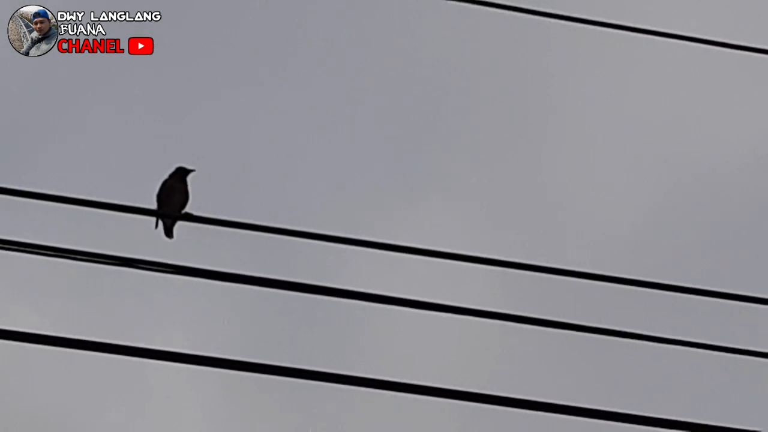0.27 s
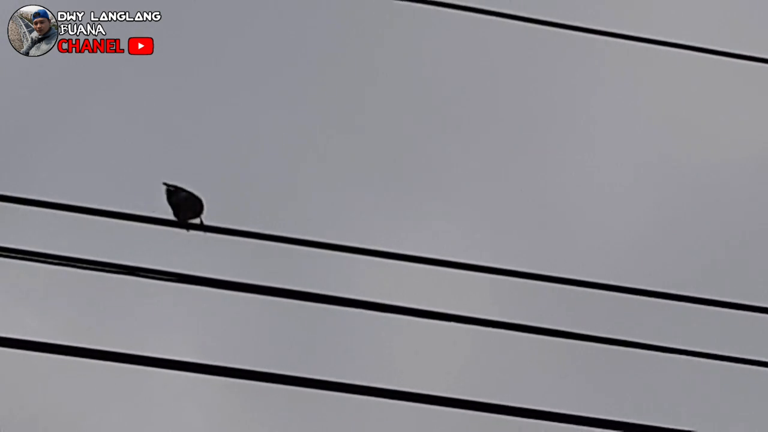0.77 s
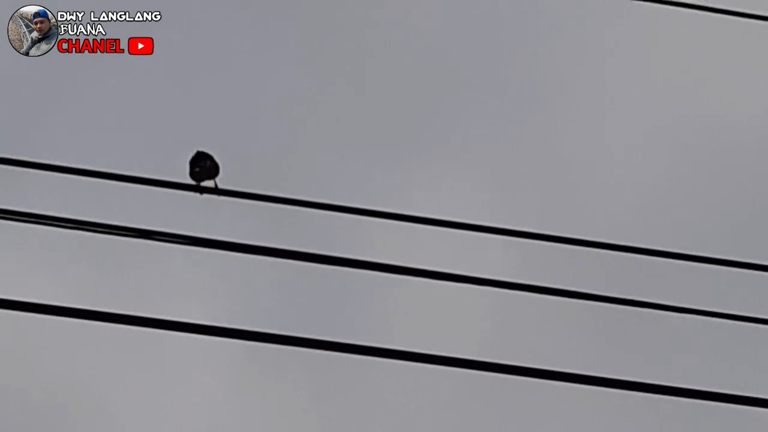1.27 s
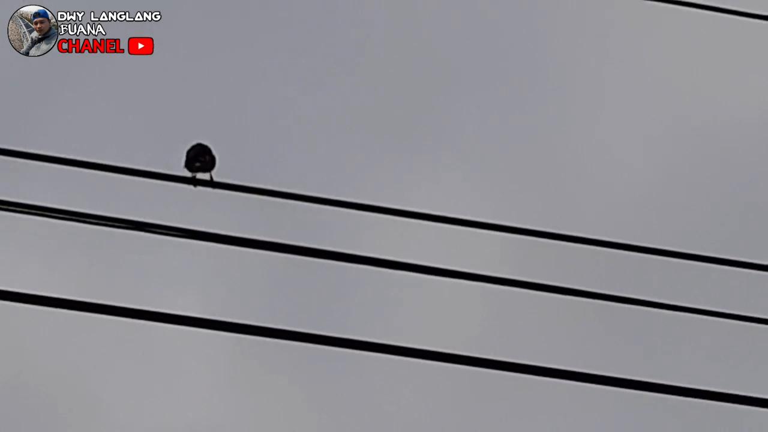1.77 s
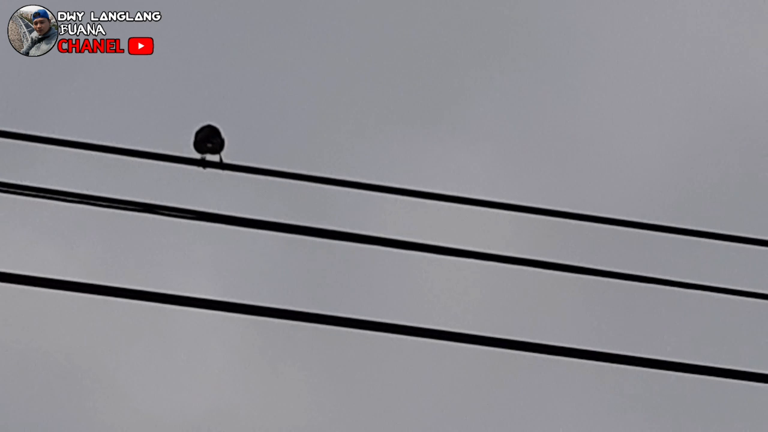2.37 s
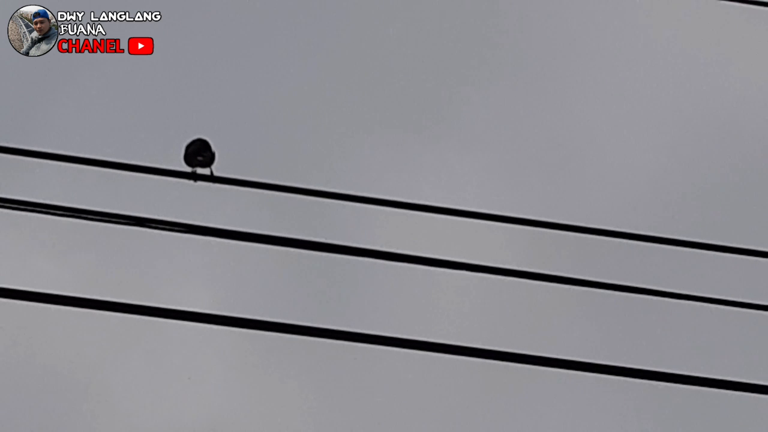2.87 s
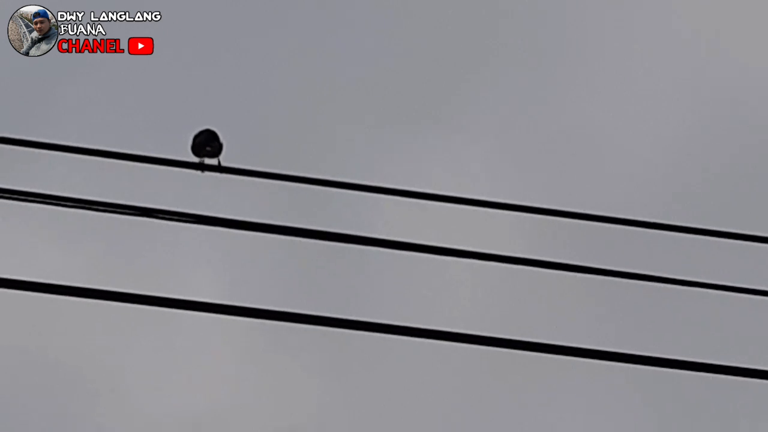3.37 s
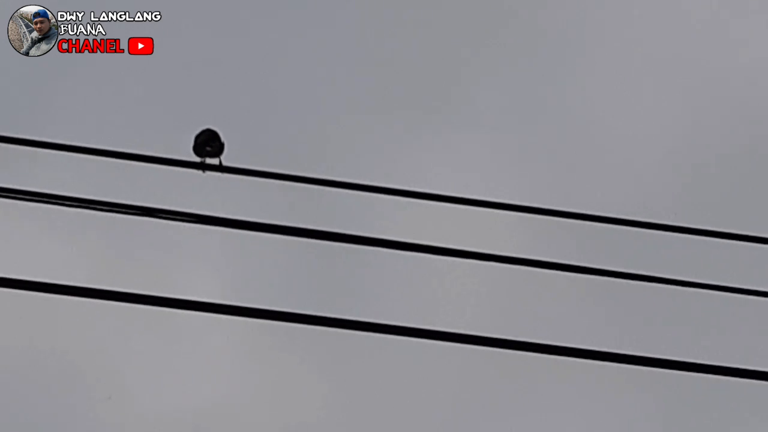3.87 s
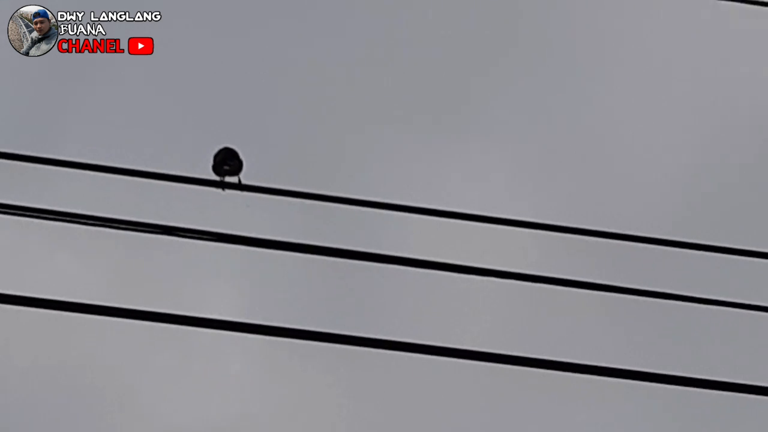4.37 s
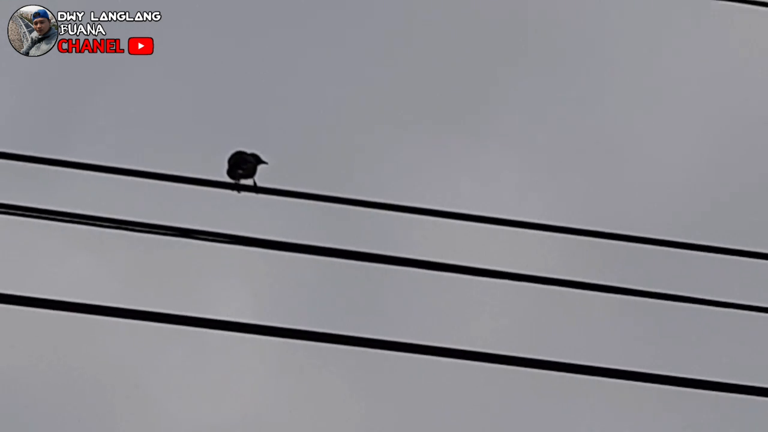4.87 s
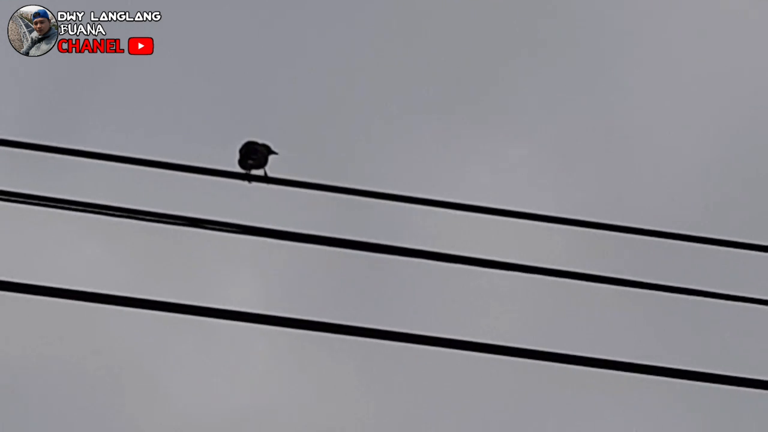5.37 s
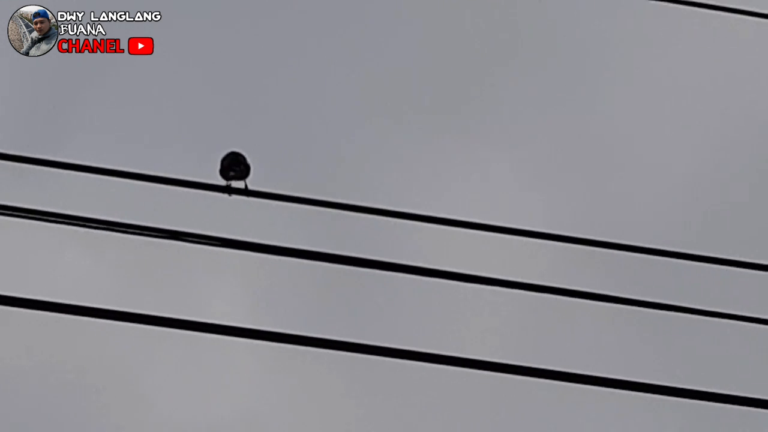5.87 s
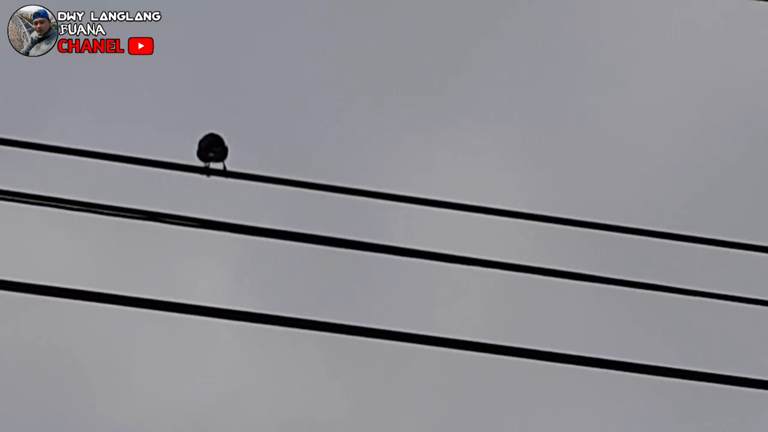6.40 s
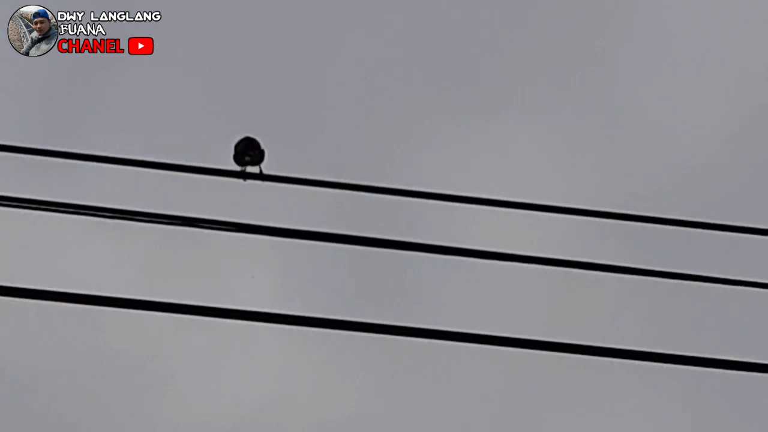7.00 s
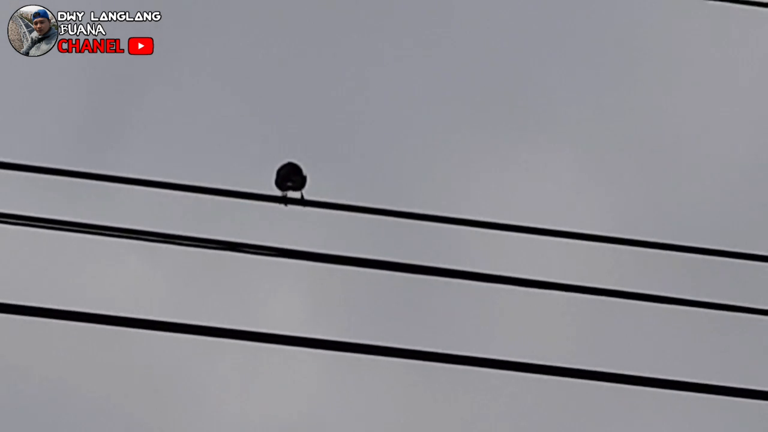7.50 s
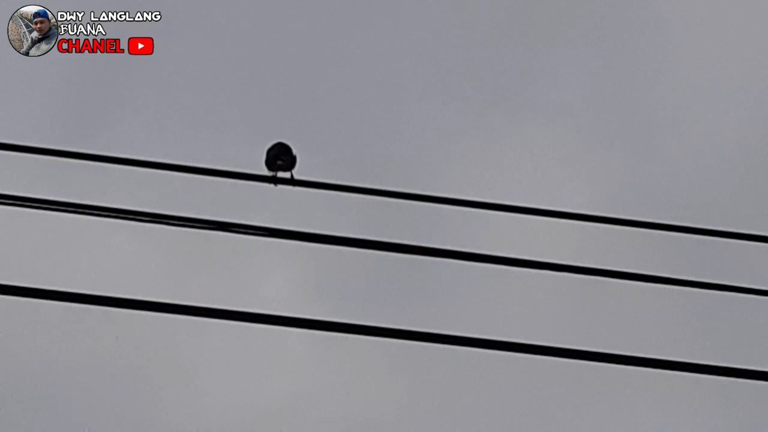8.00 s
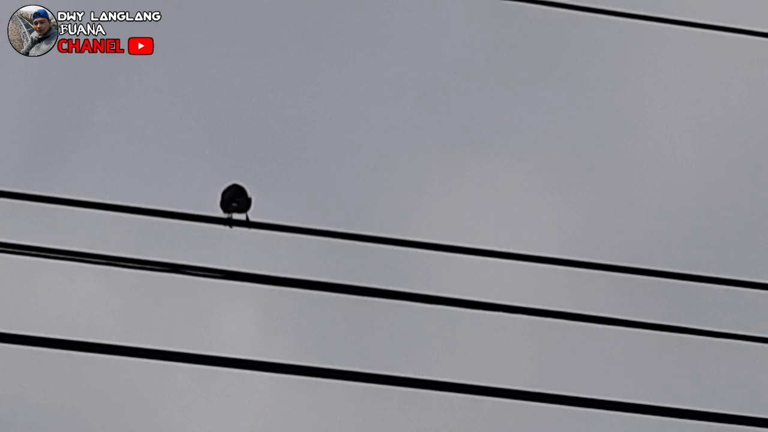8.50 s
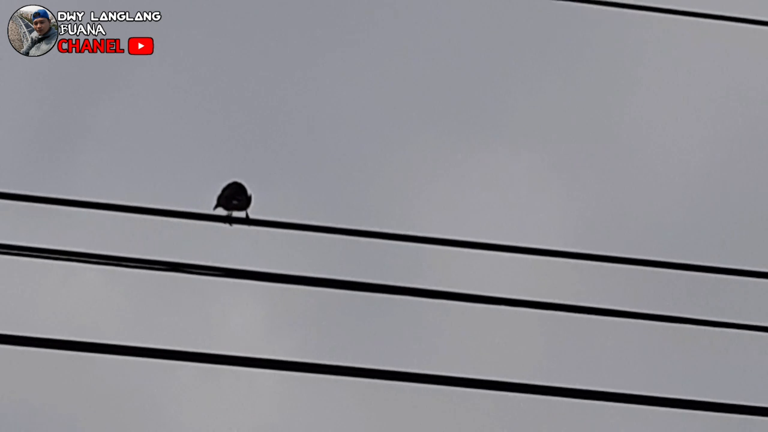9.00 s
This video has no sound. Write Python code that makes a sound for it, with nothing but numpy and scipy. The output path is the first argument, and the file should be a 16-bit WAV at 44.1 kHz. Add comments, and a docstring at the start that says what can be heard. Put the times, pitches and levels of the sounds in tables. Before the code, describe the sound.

Outdoors on a street, a starling sings from a wire a little to the left, with light reflections from nearby houses. After a soft scuff it gives a short warble and three pairs of chips and falling whistles. Far birds peep faintly and an insect barely sounds during a lull. The starling returns with two raspy mews and five rapid trills. Road rumble runs throughout, growing at the end as a vehicle approaches.

```python
"""Over the noise of a distant road a dull scuff dies away, and a starling on a wire begins to sing.
Its syrinx, whose pitch follows membrane tension, gives an opening note, then three chips, each followed
by a falling warbled slur; walls, roofs and a far house front reflect the song. In the pause come faint
peeps and a thin insect tone, and a fine hiss rises. Two hoarse two-voiced mews and five quick trills
follow. Last, the tyres and exhaust of an approaching vehicle swell as its engine takes on load."""
import sys
import numpy as np
from scipy import signal
from scipy.fft import rfft, irfft, next_fast_len
from scipy.io import wavfile
from scipy.ndimage import map_coordinates

SR = 44100
rng = np.random.default_rng(int(sys.argv[2]) if len(sys.argv) > 2 else 0)


def persist_wave(psi):
    """Save psi, clipped to +-1, as 16-bit WAV."""
    counts = np.round(np.clip(psi, -1, 1) * 32767).astype(np.int16)
    wavfile.write(sys.argv[1], SR, np.atleast_2d(counts).T)


N = 407925
JOIN_S = .0012  # a note fades in and out over this time

# Resonances of the open beak: f/Hz, gain/dB
BEAK = [(800, -36), (1300, -15.5), (2000, -0.5), (3600, -5), (4900, -19), (6200, -4.5), (7000, -8.5),
        (8200, -5), (9200, -24), (10500, -16), (12000, -23), (13500, -20), (15500, -42)]


def starling(breath_db=-22):
    """Source and filter: syrinx tones plus noise that the beak shapes and that follows the effort."""
    # Chips: t/s at which the whistle locks, level/dB, f/Hz
    chips = [(1.176, -19, 3296), (1.623, -17.5, 3295), (2.115, -19.5, 3253)]
    # Falling slurs: t/s, level/dB, f/Hz, warble rate/Hz
    slurs = [(1.271, -18, 3126, 51.9), (1.720, -19, 2950, 56.7), (2.213, -20.5, 3050, 56.6)]
    # Trills: t/s, level/dB, f/Hz, warble length/s, warble rate/Hz
    trills = [(6.895, -16.5, 2936, 0.12, 76.3), (7.128, -17.5, 2815, .122, 76.7),
              (7.349, -17, 2730, 0.13, 74.4), (7.575, -17.5, 2617, 0.13, 74.8),
              (7.81, -18.5, 2596, .13, 74.6)]
    # Mews: t/s of the split, level/dB, rise length/s, arch length/s, arch height/Hz, closing level/dB
    mews = [(5.801, -25, .026, .06, 471, -29), (6.557, -23, .057, .052, 181, -20.5)]
    calls = (chip, chips), (slur, slurs), (trill, trills), (mew, mews)
    voice, effort = opener() + sum(call(*row) for call, rows in calls for row in rows)
    breath = unit(filtered(rng.standard_normal((2, N)), lambda hz: amp(along(BEAK, hz))))
    return voice + amp(breath_db) * effort * breath


def syrinx(start_s, hz, db, rasp, depth=0, warble_hz=0, stutter=0, narrow=4,
           jitter=.011, dip_db=36, flutter_db=5, slack_hz=2250, flap_hz=240):
    """Membrane oscillation: tension modulates pitch and level together. Returns voice and effort."""
    # Overtones ahead of the beak: harmonic number, level/dB
    overtones = [(2, -20), (3, -24.5), (4, -24.5), (5, -30)]
    # Resonances of the throat: f/Hz, gain/dB
    throat = [(900, -36), (1300, -11), (1900, -2.5), (3500, 2.5), (4300, -4), (5200, -10.5), (6200, -12.5),
              (7800, -21.5), (10000, -22), (15000, -46)]
    t = np.arange(len(hz)) / SR
    drift = lambda rate: wobble(rate, size=len(t))
    # Tension collapses once a warble cycle: the pitch dives by the share depth and the tone weakens.
    cycle = np.pi * warble_hz * t + .1 * drift(40)
    dive = depth * np.abs(np.cos(cycle)) ** narrow
    pinch = depth * np.abs(np.cos(cycle)) ** (narrow + 2)
    choke = 2 * stutter * depth * np.sin(cycle) ** 16  # a second dip, halfway through the cycle
    # At the lowest pitches the slack membranes flap and chop the tone.
    slack = np.clip((slack_hz - hz) / 400, 0, .8)
    flap = 1 + slack * np.sin(2 * np.pi * flap_hz * t + drift(120.7))
    roughness = jitter + .05 * (depth + slack / 2)
    hz = hz * (1 - dive - choke / 10) * (1 + roughness * drift(902.4))
    gate = ramp(np.minimum(t, t[-1] - t) / JOIN_S)
    envelope = gate * flap * amp(db - dip_db * (pinch + choke) + flutter_db * depth * drift(223))
    phase = 2 * np.pi * np.cumsum(hz) / SR
    tone = np.sin(phase)
    for k, level in overtones:
        gain = amp(level + along(BEAK, k * hz)) * (k * hz < SR / 2)
        tone += gain * np.sin(k * phase + k * drift(595) / 5)
    # In a rasp the period doubles: lines at half the spacing sound through the throat.
    halves = sum(amp(along(throat, k * hz / 2) + 3 * drift(300))
                 * np.sin(k * phase / 2 + .6 * drift(500)) for k in (1, 3, 4, 5))
    voice = np.sqrt(2) * envelope * (tone + rasp * halves)
    effort = envelope * (hz / 3000) ** 5.2  # high, tense notes carry the most hoarseness
    track, first = np.zeros((2, N)), round(start_s * SR)
    track[:, first:first + len(t)] = voice, effort
    return track


def glide(start_s, length_s, db, from_hz, to_hz, arch_hz=0, swell_db=0, rasp=0):
    """Frequency sweep along a parabola; the level swells up to db, or fades from it."""
    t = clock(length_s + JOIN_S)
    u = t / t[-1]
    hz = from_hz + (to_hz - from_hz) * u + arch_hz * (1 - (2 * u - 1) ** 2)
    return syrinx(start_s, hz, db + swell_db * u - max(swell_db, 0), rasp)


def opener(s=.563, db=-27, pip_s=.026, warble_s=.112, settle_s=.028, depth=.4,
           top_hz=3150, rest_hz=2230, sag_hz_per_s=5500, swell_db_per_s=30):
    """Vanishing modulation: after a thin pip, a sagging warble settles on a clean low whistle."""
    t = clock(warble_s)
    unsettled = ramp((warble_s - t) / settle_s)
    hz = rest_hz + (top_hz - sag_hz_per_s * t - rest_hz) * unsettled
    level = db + swell_db_per_s * (t - warble_s / 2)
    pip = glide(s - pip_s, pip_s, db - 2.5, from_hz=3590, to_hz=3620, swell_db=12, rasp=.03)
    warble = syrinx(s, hz, level, rasp=.067, depth=depth * unsettled, warble_hz=62.7, stutter=.294)
    whistle = glide(s + warble_s, .024, db + 6, rest_hz, rest_hz, rasp=.0085)
    return pip + warble + whistle


def chip(s, db, pitch_hz, sweep_s=.03, squeak_s=.021, low_hz=1950, sweep_hz=1800, swell_db=19,
         length_s=.064, drop_at_s=.018, drop_s=.00453, drop_share=.34, fade_db_per_s=800):
    """Frequency jumps: an upsweep overshoots into a squeak; the whistle locks, drops a fifth, fades."""
    u = clock(sweep_s) / sweep_s
    rising_hz = low_hz + sweep_hz * u ** 3
    sweep = syrinx(s - squeak_s - sweep_s, rising_hz, db - 5 + swell_db * (u - 1), rasp=.35)
    squeak = glide(s - squeak_s, squeak_s, db - 20.5, from_hz=4100, to_hz=4350, arch_hz=530, rasp=1)
    t = clock(length_s)
    dropped = (1 + np.tanh((t - drop_at_s) / drop_s)) / 2
    fade_db = fade_db_per_s * np.maximum(t - drop_at_s, 0)
    whistle = syrinx(s, pitch_hz * (1 - drop_share * dropped), db - fade_db, rasp=.03 + .2 * dropped)
    return sweep + squeak + whistle


def lead_in(s, db, hold_s, flick_s=.012):
    """Onset transient of slurs and trills: a rasping upward flick breaks into a short, clear note."""
    flick = glide(s - flick_s, flick_s, db - 4, from_hz=3300, to_hz=4360, swell_db=5, rasp=.75)
    return flick + glide(s, hold_s, db, from_hz=3620, to_hz=3247, arch_hz=49.7, swell_db=2, rasp=.13)


def slur(s, db, pitch_hz, warble_hz, length_s=.14, sag_hz_per_s=4500, depth=.28,
         attack_s=.01, attack_db=5, plunge_s=.06, plunge_hz=1300, fade_db=23):
    """Relaxing tension: a stuttering warble sags, then plunges and dies."""
    t, hold_s = clock(length_s), 1 / warble_hz
    plunge = ramp(1 - (length_s - t) / plunge_s)
    hz = pitch_hz - sag_hz_per_s * t - plunge_hz * plunge
    level = db - attack_db * ramp(1 - t / attack_s) - fade_db * plunge ** 2.55
    onset = lead_in(s, db - 5.5, hold_s)
    return onset + syrinx(s + hold_s, hz, level, rasp=.036, depth=depth * (1 - .81 * plunge),
                          warble_hz=warble_hz, stutter=.852, narrow=9)


def mew(s, db, rise_s, arch_s, arch_hz, close_db, split_s=.032):
    """Biphonation: after a hoarse rise one side of the syrinx climbs and arches, the other sinks."""
    rise = glide(s - rise_s, rise_s, db - 5.5, 2230, 2840, arch_hz=-64, swell_db=15, rasp=.63)
    climb = glide(s, split_s, db, from_hz=3150, to_hz=3720, arch_hz=110, swell_db=2.5, rasp=.093)
    sink = glide(s, split_s, db - 10.5, from_hz=2700, to_hz=2024, swell_db=-2, rasp=.05)
    arch = glide(s + split_s, arch_s, db - 9.5, from_hz=3830, to_hz=3740, arch_hz=arch_hz, rasp=.2)
    under = glide(s + split_s, arch_s, db=-36, from_hz=2880, to_hz=2620, swell_db=-2, rasp=.2)
    lowest = glide(s + split_s, arch_s, db=-42, from_hz=1930, to_hz=1720, swell_db=-2)
    close = glide(s + split_s + arch_s, .023, close_db, 3680, 3420, swell_db=-13, rasp=.085)
    return rise + climb + sink + arch + under + lowest + close


def trill(s, db, pitch_hz, length_s, warble_hz, sag_hz_per_s=1300, swell_db_per_s=80,
          release_s=.023, release_db=14, depth=.38, easing_per_s=3.2):
    """Fast frequency modulation of a nearly level pitch: it swells, grows shallower and is released."""
    t, hold_s = clock(length_s), 2 / warble_hz
    release = ramp(1 - (length_s - t) / release_s)
    hz = pitch_hz - sag_hz_per_s * t
    level = db - swell_db_per_s * np.maximum(length_s - release_s - t, 0) - release_db * release ** 2
    dives = depth * np.exp(-easing_per_s * t) * (1 - .58 * release)
    onset = lead_in(s, db - 9, hold_s)
    return onset + syrinx(s + hold_s, hz, level, rasp=.027, depth=dives, warble_hz=warble_hz, narrow=4.5)


def street(bird, direct_db=-2.13, roofs_db=-18, far_db=-19, house_db=-17, house_s=.1):
    """Reflection: near walls comb-filter the song, roofs scatter it and a house front echoes it."""
    # Near-wall reflections, left then right: delay/s, amplitude ratio
    walls = [
        [(.00115, .3), (.0048, .15), (.0077, .11)],
        [(.00105, .26), (.00725, .28), (.0134, .1)],
    ]
    # Balance of a bird sitting to the left: f/Hz, left minus right level/dB
    balance = [(1500, 7.5), (2300, 7.2), (2800, 7), (3500, 5), (4200, -2), (6000, 3), (9000, 5.5)]
    # Colour of the house front's echo: f/Hz, gain/dB
    facade = [(1200, -16), (2200, -5.5), (3000, -9.5), (4000, -5), (8000, 6)]
    delay = lambda hz, s: np.exp(-2j * np.pi * hz * s)
    comb = lambda hz: np.array([1 + sum(g * delay(hz, s) for s, g in side) for side in walls])
    direct = filtered(bird, lambda hz: amp(direct_db) * comb(hz) * panning(balance, hz))
    diffuse = amp(roofs_db) * tail(t60_scale=.15) + amp(far_db) * tail(t60_scale=1.13)
    scatter = signal.fftconvolve(bird, diffuse, axes=1)[:, :N]
    echo = filtered(bird, lambda hz: amp(house_db + along(facade, hz)) * delay(hz, house_s))
    return direct + scatter + echo


def tail(t60_scale):
    """Reverberation: a diffuse stereo response of energy 1 that rings longest near 3 kHz."""
    # Decay of the street before scaling: f/Hz, T60/s
    decay = [(500, 0.15), (3000, 1), (10000, 0.033)]
    hz, t, spectrum = signal.stft(rng.standard_normal((2, SR)), SR, nperseg=256)
    t60 = t60_scale * along(decay, hz)[:, None]
    ring = signal.istft(spectrum * amp(-60 * t / t60), SR, nperseg=256)[1]
    return ring / np.linalg.norm(ring[0])


def traffic(rumble_db=-37, rumble_grows=.22, road_db=-41.5, road_grows=.32,
            tyres_db=-34, tyres_grows=1.61):
    """Broadband noise: the distant road rumbles and hisses; tyre roar swells most as a vehicle nears."""
    # Spectra of rumble, road hiss and tyre roar: f/Hz, relative density level/dB
    rumble_spectrum = [(20, -32), (35, -16), (52, -12.5), (72, -5), (108, 1), (150, -4.5), (195, -3),
                       (228, -0.5), (310, -10.5), (400, -13), (600, -18.5), (900, -50)]
    road_spectrum = [(240, -45), (400, -9.5), (533, -4.5), (1290, -12), (1890, -5), (2940, -17.5),
                     (3810, -18), (4690, -26.5), (7310, -26.5), (9000, -42), (11700, -48), (19800, -120)]
    tyre_spectrum = [(150, -31), (240, -5.5), (300, 3.5), (380, -6.5), (600, -8.5), (1100, -6), (1700, -11),
                     (3000, -20.5), (6000, -26.5), (9000, -32)]
    near_db = nearness()
    rumble = amp(rumble_db + rumble_grows * near_db + 1.5 * wobble(14)) * rush(rumble_spectrum)
    road = amp(road_db + road_grows * near_db + .9 * wobble(7.4)) * rush(road_spectrum)
    tyres = amp(tyres_db + tyres_grows * near_db + .75 * wobble(9)) * rush(tyre_spectrum)
    return rumble + road + tyres


def engine(firing_hz=46.04, engine_db=-37.5, grows=.72, load_db=6, waver_db=1.5, hum_hz=56.3):
    """Periodic firing: exhaust harmonics grow with nearness and load, over a deep far hum."""
    # Exhaust harmonics: multiple of the firing rate, relative level/dB
    orders = [(1, -22), (2, -1), (3, -2.5), (4, -6), (5, -15), (6, -14), (7, -17), (8, -16), (9, -21)]
    # Envelope of the hum: t/s, relative level/dB
    hum_levels = [(0.1, -54), (1.67, -47.5), (2.56, -64), (3.75, -47.5), (4.84, -67), (5.12, -57),
                  (6.54, -54), (7.68, -48), (9.2, -55)]
    load = step(at_s=8.45, rise_s=.18)
    db = engine_db + grows * nearness() + load_db * load
    phase = 2 * np.pi * np.cumsum(firing_hz * (1 + .0081 * load + .004005 * wobble(8))) / SR
    exhaust = sum(amp(db + level + waver_db * wobble(5)) * np.sin(k * phase + rng.uniform(0, 2 * np.pi))
                  for k, level in orders)
    hum_db = np.interp(np.arange(N) / SR, *np.transpose(hum_levels)) + 2 + 2.5 * wobble(10)
    hum = amp(hum_db) * sine(hum_hz + 1.82 * wobble(4.4))
    return np.sqrt(2) * (exhaust + hum) * amp([[.7], [-.7]])  # slightly to the left


def nearness(closest_s=9.57, speed_m_per_s=7.7, closest_m=11.94):
    """Spherical spreading: the vehicle's level in dB relative to its closest point."""
    distance_m = np.hypot(closest_m, speed_m_per_s * (np.arange(N) / SR - closest_s))
    return 20 * np.log10(closest_m / distance_m)


def scuff(start_s=.0036, level_db=-41, t60=1.0):
    """Exponential decay: one dull burst of noise dies away."""
    spectrum = [(300, -12), (750, 2), (1500, -10), (4000, -14), (7000, -48)]  # f/Hz, level/dB
    t = np.arange(N) / SR - start_s
    return (t > 0) * amp(level_db - 60 * np.abs(t) / t60) * rush(spectrum)


def far_birds(length_s=.058, sag_share=.08, fade_db=20):
    """Scattering: faint peeps that sag as they fade arrive only as diffuse sound."""
    # Small birds far off: t/s, level/dB, f/Hz
    peeps = [(2.745, -62, 7070), (3.755, -62, 5150), (3.805, -63, 5500), (3.895, -52, 2210),
             (4.525, -57, 3650), (4.585, -56, 4020), (4.70, -55, 4000), (4.745, -60, 3800)]
    late = (clock(length_s) / length_s) ** 3
    voice = sum(syrinx(s, hz * (1 - sag_share * late), db - fade_db * late,
                       rasp=0, depth=.103, warble_hz=90.6)[0] for s, db, hz in peeps)
    return signal.fftconvolve(voice[None], tail(t60_scale=.3), axes=1)[:, :N]


def insect(pitch_hz=3250, level_db=-70, loudest_s=3.5, fade_db_per_s=4):
    """Stridulation: a faint, thin tone that comes and goes."""
    db = level_db - fade_db_per_s * np.abs(np.arange(N) / SR - loudest_s)
    return amp(db + 3.4 * wobble(6.8)) * sine(pitch_hz + 18 * wobble(120))


def hiss(start_db=-84):
    """High-band noise: a fine hiss that grows in two steps."""
    # Spectrum of the hiss: f/Hz, relative density level/dB
    spectrum = [(2000, -20), (4000, -2), (7600, 0), (8700, -4), (12000, 0), (14000, -2), (15500, -2)]
    # Steps in its level: t/s, rise time/s, gain/dB
    rises = [(4.35, .2, 12.5), (7.9, .35, 12.5)]
    return amp(start_db + sum(db * step(s, rise_s) for s, rise_s, db in rises)) * rush(spectrum)


def rush(spectrum):
    """Partial coherence: outdoor stereo noise of rms 1, nearly mono in the bass."""
    # Likeness of left and right: f/Hz, correlation
    coherence = [(40, .98), (130, .95), (290, .88), (640, .25), (1410, -.2), (3100, 0), (15000, -.05)]
    # Balance of the background: f/Hz, left minus right level/dB
    balance = [(60, 4), (130, 2.5), (290, 0.5), (640, 2), (1410, 7.5), (3100, 3.5), (6820, -3.5),
               (15000, 3)]
    angle = lambda hz: np.arccos(np.clip(along(coherence, hz), -1, 1)) / 2
    response = lambda hz: amp(along(spectrum, hz)) * [np.cos(angle(hz)), np.sin(angle(hz))]
    mid, side = filtered(rng.standard_normal((2, N)), response)
    return unit(filtered(np.array([mid + side, mid - side]), lambda hz: panning(balance, hz)))


def panning(balance, hz):
    """Left and right gains from a level difference in dB."""
    return amp(np.outer([.5, -.5], along(balance, hz)))


def filtered(x, response):
    """Linear filtering: the spectrum of x times a complex response of frequency."""
    size = next_fast_len(N + SR // 2)
    return irfft(rfft(x, size) * response(np.fft.rfftfreq(size, 1 / SR)), size)[..., :N]


def along(points, hz):
    """Interpolation of (f/Hz, value) points on a log frequency axis."""
    f, values = np.transpose(points)
    return np.interp(np.log(hz + 1), np.log(f + 1), values)


def wobble(rate, size=N):
    """A smooth random curve, rate knots a second."""
    knots = rng.standard_normal(size // 8 + 4)
    return map_coordinates(knots, [np.arange(size) * rate / SR], mode="wrap")


def sine(hz):
    """A tone whose phase is the integral of its frequency."""
    return np.sin(2 * np.pi * np.cumsum(hz) / SR)


def amp(db):
    """Decibels to gain."""
    return 10 ** (np.asarray(db) / 20)


def unit(x):
    """Scale to rms 1."""
    return x / np.sqrt(np.mean(x ** 2) + 1e-20)


def clock(length_s):
    """Seconds since the start of a note, one value per sample."""
    return np.arange(round(max(length_s, .002) * SR)) / SR


def ramp(x):
    """From 0 to 1, then held."""
    return np.clip(x, 0, 1)


def step(at_s, rise_s):
    """A smooth step from 0 to 1."""
    return (1 + np.tanh((np.arange(N) / SR - at_s) / rise_s)) / 2


def scene():
    """Superposition: the bird over the sounds of the street."""
    return street(starling()) + far_birds() + traffic() + hiss() + engine() + insect() + scuff()


def record(dry):
    """Band limiting: an ideal low-pass keeps nothing above 15.6 kHz."""
    return filtered(dry, lambda hz: hz < 15600)


dry = scene()
out = record(dry)
persist_wave(out)
```